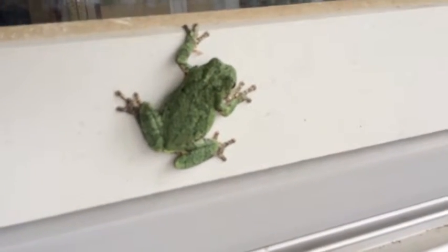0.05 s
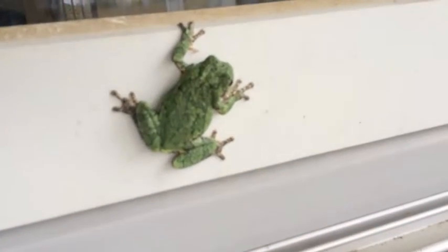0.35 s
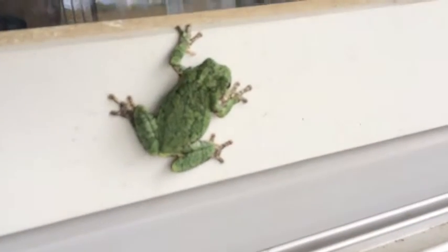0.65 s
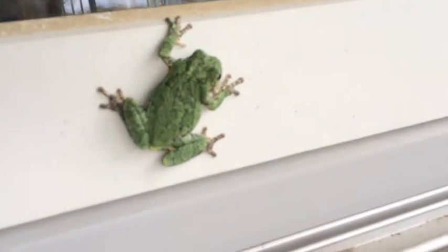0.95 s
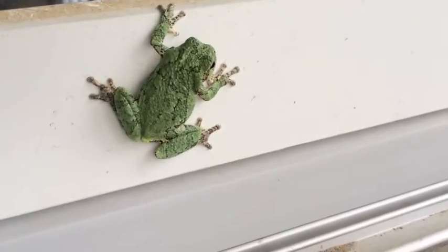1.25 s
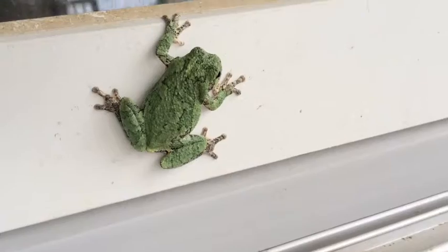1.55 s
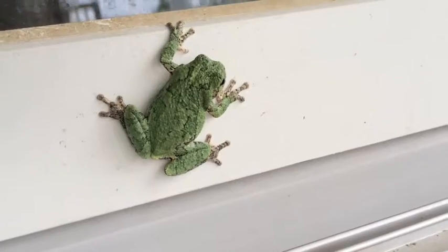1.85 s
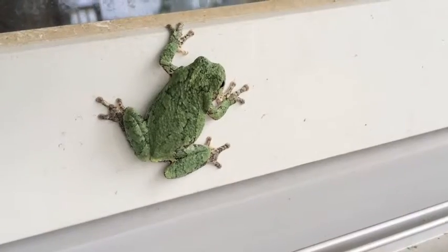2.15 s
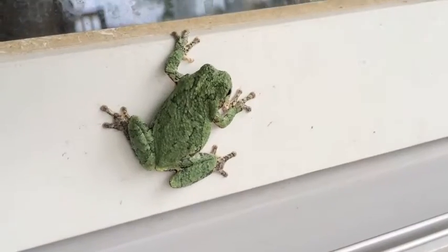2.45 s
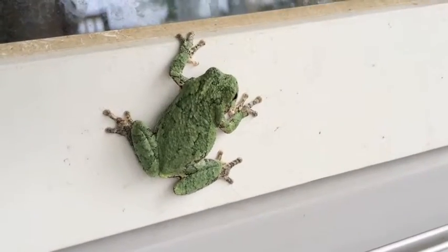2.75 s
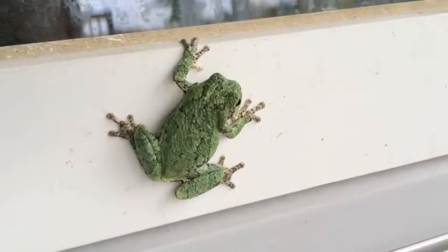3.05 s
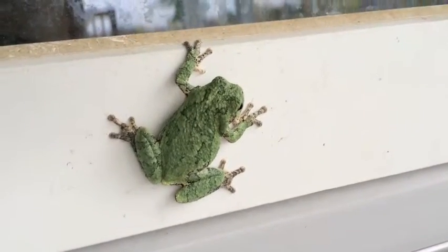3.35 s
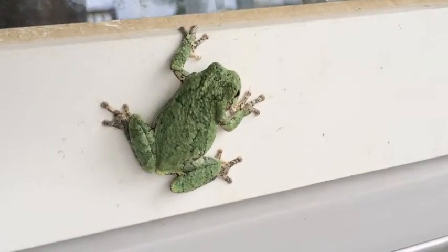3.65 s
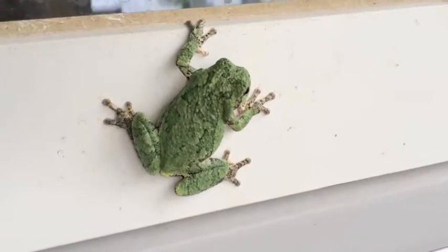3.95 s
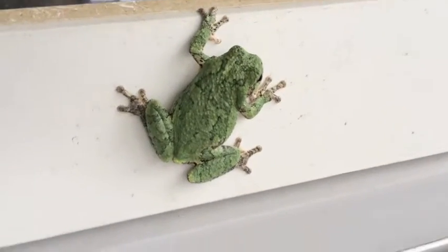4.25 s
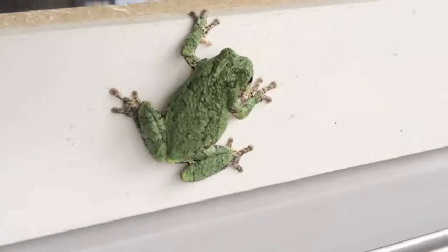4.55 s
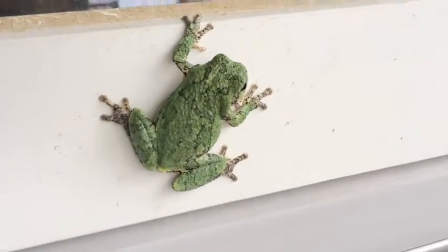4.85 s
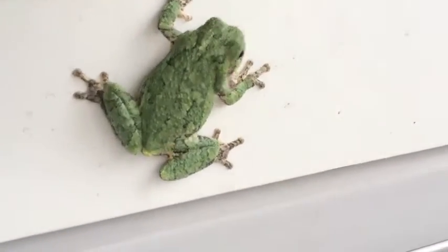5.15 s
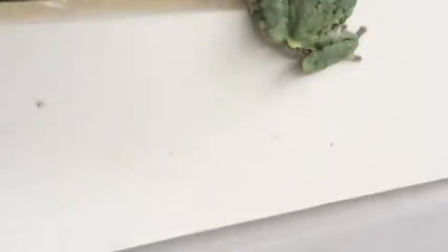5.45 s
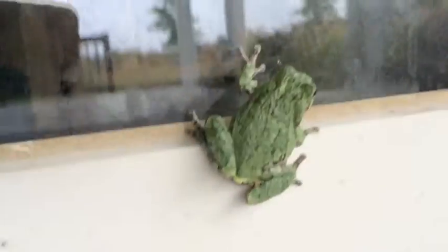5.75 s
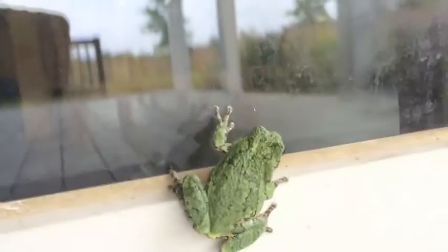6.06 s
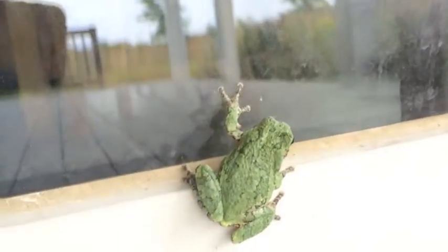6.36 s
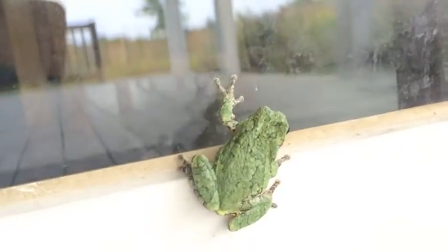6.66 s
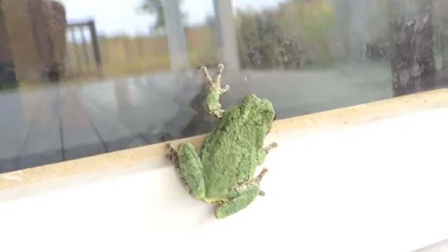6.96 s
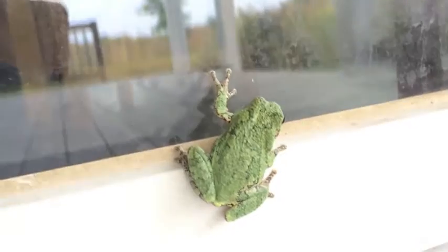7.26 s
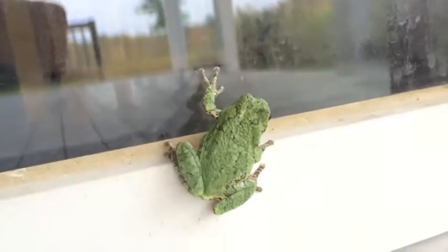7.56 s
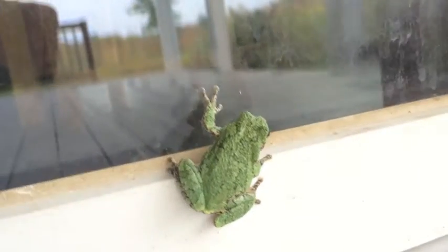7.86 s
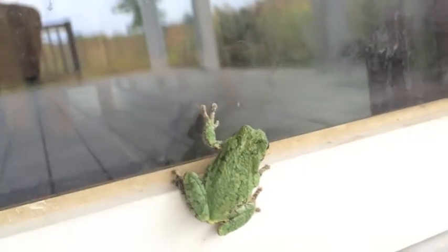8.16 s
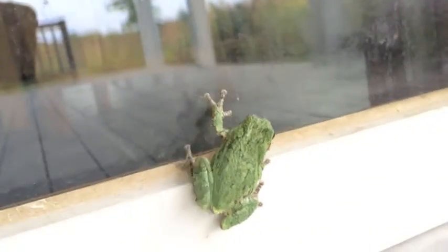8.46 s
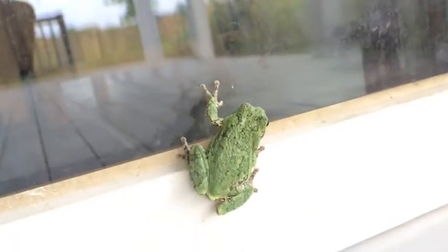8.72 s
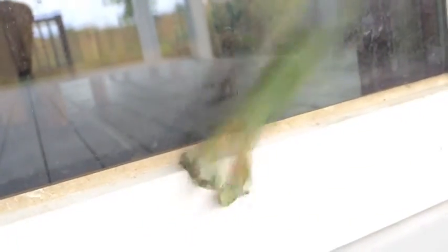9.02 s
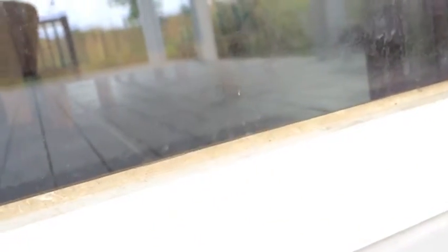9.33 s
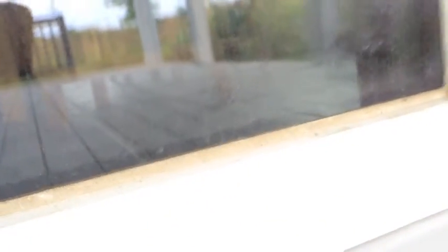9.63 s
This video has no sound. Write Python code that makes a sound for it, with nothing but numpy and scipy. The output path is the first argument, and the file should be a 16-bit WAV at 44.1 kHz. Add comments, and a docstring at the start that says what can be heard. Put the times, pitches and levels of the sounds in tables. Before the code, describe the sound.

Crickets trill steadily outdoors over faint wind rumble, with a few dull microphone bumps and tiny pats from a climbing frog.

```python
"""On a porch, hand-held microphone: crickets and other insects trill in the grass beyond.
Three kinds rub their wings, each a blurred far chorus with one nearer singer whose pulses stand out.
A tree frog climbs the door without calling; its feet make tiny pats and its skin brushes the frame.
Light air rumbles at the microphone, the hand gives it a few soft bumps, and three hoots sound far off.
A faint band of hiss, reflected off the nearby glass, sinks in pitch as the microphone moves."""
import sys
import numpy as np
from scipy import signal
from scipy.fft import rfft, irfft, next_fast_len
from scipy.io import wavfile

SR = 44100
rng = np.random.default_rng(int(sys.argv[2]) if len(sys.argv) > 2 else 0)


def waveform_to_disk(signal):
    """Save audio, clipped to [-1, 1], as 16-bit WAV at the path in sys.argv[1]."""
    frames = np.transpose(np.atleast_2d(signal))
    scaled = np.clip(frames, -1, 1) * 32767
    samples = np.round(scaled).astype(np.int16)
    wavfile.write(sys.argv[1], SR, samples)


N = 436149

# far outdoor hush; the notch near 8.6 kHz comes from audio compression: frequency_hz, relative_db
HUSH_SPECTRUM = [(100, -8), (250, 3), (400, 3.5), (600, 0), (950, 0), (1500, -4), (2100, -5.5),
                 (2700, -7.5), (3300, -7.5), (4500, -7.5), (7000, -12), (8600, -29.5), (10000, -16.5),
                 (15000, -26)]
# spectrum of air moving at the microphone: frequency_hz, relative_db
RUMBLE_SPECTRUM = [(15, -20), (30, -20.5), (45, -5), (62, 2), (90, 0.5), (110, -1.5), (140, -3),
                   (180, -10.5), (250, -16.5), (400, -29.5), (800, -40)]
# strength of the breeze: time_s, level_db
BREEZE_LEVEL = [(0, -60), (2.2, -59.5), (3.2, -60.5), (4.05, -59), (4.5, -64.5), (6.2, -60.5), (7.2, -60),
                (8.4, -63.5), (9.89, -60)]
# faint far hoots: centre_s, pitch_hz, level_db, length_s
FAR_HOOTS = [(3.928, 930, -74, .2), (6.714, 1074, -75, .14), (7.099, 960, -72, .34)]
# single bumps on the microphone: centre_s, level_db, pitch_hz
MIC_BUMPS = [(4.674, -37.5, 95), (4.716, -40.5, 122), (5.058, -33, 78), (5.191, -38.5, 86),
             (5.228, -37.5, 78), (5.426, -40, 108), (5.752, -40.5, 61.4), (6.173, -51, 190),
             (7.431, -28, 108), (7.443, -26, 76), (7.515, -24.5, 151), (7.602, -22.5, 93),
             (7.708, -33.5, 145), (7.805, -24, 84), (9.7, -42, 74)]
# shifts of grip that jostle the microphone: start_s, length_s, level_db, pitch_hz
GRIP_SHIFTS = [(4.754, .05, -49, 76), (5.036, .085, -46, 72), (5.348, .07, -46, 81),
               (5.774, .06, -43.5, 64), (7.169, .17, -53.5, 95), (7.46, .11, -32.5, 124),
               (7.616, .085, -43.5, 133), (7.728, .145, -34, 103.3), (8.041, .16, -49, 79)]
# sticky feet on frame and glass: start_s, level_db (before the bass cut), pitch_hz, ring_s,
# crackle_db (relative to level_db)
FOOT_PATS = [(5.281, -53, 8500, .0003, -6), (5.308, -53, 12500, .0003, -6), (5.349, -44, 4180, .0003, -10),
             (8.408, -32.5, 750, 0.00023, -36), (9.102, -56, 10840, .0003, -3),
             (9.295, -42, 2600, .00025, -26), (9.333, -30.5, 1400, 0.00018, -23),
             (9.371, -53, 12000, .0002, -8)]
# spectrum of the frog's skin brushing the frame: frequency_hz, relative_db
SKIN_SPECTRUM = [(1500, -25), (3500, -11), (8300, 7), (10000, -6), (15000, -8)]
# spectra of the three far choruses and of the wings' overtones: frequency_hz, relative_db
LOW_SPECTRUM = [(3250, -51), (3480, -13.5), (3620, -2), (3720, 2.5), (3800, 3.5), (3900, -6), (4020, -15.5),
                (4350, -32)]
MIDDLE_SPECTRUM = [(4150, -39), (4650, -14.5), (5000, -8), (5300, -1), (5550, 0), (5800, -1.5), (6100, -9),
                   (6600, -25.5)]
HIGH_SPECTRUM = [(5900, -30), (6500, -10), (6850, -2), (7070, 1), (7300, -4), (7550, -10), (7820, -11.5),
                 (8080, -23), (8400, -49)]
SHEEN_SPECTRUM = [(8000, -41), (9200, -8.5), (10200, -7.5), (11100, -2), (12000, -7.5), (12800, -11.5),
                  (14000, -4.5), (14600, -9), (15400, -10)]
# how loudly each kind sings: time_s, level_db (before its trim in the mix)
LOW_SONG = [(0.0, -67), (0.19, -69.5), (0.72, -67.5), (0.99, -70), (2.01, -68), (2.48, -70), (4.05, -67.5),
            (5.04, -69), (5.53, -72), (5.95, -68.5), (6.61, -67), (7.96, -69), (8.48, -67), (9.89, -66.5)]
MIDDLE_SONG = [(0.0, -62), (0.22, -62), (2.18, -61), (2.37, -60.5), (3.55, -61), (4.32, -62.5), (6.01, -61),
               (7.05, -62), (7.35, -61.5), (7.65, -62.5), (9.53, -61.5), (9.89, -60.5)]
HIGH_SONG = [(0.0, -64.5), (1.13, -64), (2.07, -65.5), (2.26, -64), (4.71, -65), (5.95, -63), (9.89, -62.5)]


def gain_of(db):
    """Decibels to a factor."""
    return 10 ** (np.asarray(db) / 20)


def unit_rms(x):
    """Scales to rms 1."""
    return x / np.sqrt(np.mean(x ** 2) + 1e-20)


def clock():
    """The time of every sample, in seconds."""
    return np.arange(N) / SR


def follow(rows):
    """A table of times and levels as a curve, sample by sample."""
    return np.interp(clock(), *np.transpose(rows))


def wander(per_s):
    """A random curve of rms 1 that takes a new value per_s times a second."""
    return unit_rms(np.interp(clock() * per_s, np.arange(2000), rng.standard_normal(2000)))


def coloured(x, spectrum):
    """Filters x by a spectrum table, at rms 1."""
    points_hz, db = np.transpose(spectrum)
    size = next_fast_len(N)
    hz = np.fft.rfftfreq(size, 1 / SR)
    shape = gain_of(np.interp(np.log(hz + 1), np.log(points_hz), db, left=-90, right=-90))
    return unit_rms(irfft(rfft(x, size) * shape, size)[:N])


def noise(spectrum):
    """Noise with the given spectrum, at rms 1."""
    return coloured(rng.standard_normal(N), spectrum)


def resonate(x, hz, width_hz):
    """A steep resonance at rms 1: shifts hz down to zero, smooths twice and shifts back."""
    carrier = np.exp(2j * np.pi * np.cumsum(hz * np.ones(N)) / SR)
    pole = np.exp(-np.pi * width_hz / SR)
    smoothed = signal.lfilter([1.], [1, -2 * pole, pole * pole], x / carrier)
    return unit_rms((carrier * smoothed).real)


def add(mix, start_s, sound):
    """Mixes a sound in at start_s."""
    part = mix[max(round(start_s * SR), 0):][:len(sound)]
    part += sound[:len(part)]


def air(hush_db=-68):
    """A smooth hush from far off, and the lumpy rumble of a light breeze at the microphone."""
    hush = noise(HUSH_SPECTRUM) * gain_of(hush_db + 0.79 * wander(8))
    rumble = unit_rms(noise(RUMBLE_SPECTRUM) * gain_of(2.2 * wander(25)))
    return hush + rumble * gain_of(follow(BREEZE_LEVEL))


def glass_hiss(start_s=7.9, rise_s=.25, start_hz=3280, sink_hz_per_s=220, level_db=-80):
    """A faint band of hiss, reflected off the nearby glass, sinks in pitch as the microphone moves."""
    since_s = np.maximum(clock() - start_s, 0)
    hiss = resonate(rng.standard_normal(N), start_hz - sink_hz_per_s * since_s, width_hz=360)
    return hiss * gain_of(level_db) * np.minimum(since_s / rise_s, 1)


def far_hoots(waver=0.0124):
    """Distant wavering tones, each swelling and fading in the hush."""
    out = np.zeros(N)
    for centre_s, hz, db, length_s in FAR_HOOTS:
        size = round(length_s * SR)
        cycles = np.cumsum(hz * (1 + waver * wander(37)[:size])) / SR
        add(out, centre_s - length_s / 2, gain_of(db) * np.hanning(size) * np.sin(2 * np.pi * cycles))
    return out


def add_bump(mix, centre_s, db, hz, half_cycles=0.56):
    """One bump on the microphone: a dull push of a cycle or two with a weaker, higher knock."""
    t = np.arange(-SR // 16, SR // 16) / SR
    swell = np.exp(1.7 * (1 - np.sqrt(1 + (t * hz / half_cycles) ** 2)))
    push = np.cos(2 * np.pi * (hz * t + rng.random()))
    knock = 0.19 * np.cos(2 * np.pi * (1.84 * hz * t + rng.random()))
    add(mix, centre_s + t[0], gain_of(db) * swell * (push + swell * knock))


def handling(bumps_per_s=50, unevenness=0.189, spread_db=2.5, spread_octaves=0.35):
    """The hand knocks the microphone, and each shift of grip sets off a run of uneven bumps."""
    out = np.zeros(N)
    for centre_s, db, hz in MIC_BUMPS:
        add_bump(out, centre_s, db, hz)
    for start_s, length_s, db, hz in GRIP_SHIFTS:
        for k, (late, louder, higher) in enumerate(rng.standard_normal((16, 3))):
            if k / bumps_per_s <= length_s:
                centre_s = start_s + (k + unevenness * late) / bumps_per_s
                add_bump(out, centre_s, db + spread_db * louder, hz * 2 ** (spread_octaves * higher))
    return out


def frog(brush_at_s=5.315, brush_half_s=0.047, brush_db=-70, crackle_s=0.0016):
    """On the door, skin brushes the frame and wet toe pads give dead pats with a short crackle."""
    brush = np.exp(-.5 * ((clock() - brush_at_s) / brush_half_s) ** 4)
    out = noise(SKIN_SPECTRUM) * brush * gain_of(brush_db + 3.5 * wander(120))
    t = np.arange(SR // 40) / SR
    for start_s, db, hz, ring_s, crackle_db in FOOT_PATS:
        pat = np.sin(2 * np.pi * hz * t) * np.exp(-t / ring_s)
        bass_cut = signal.butter(2, 0.55 * hz, "highpass", fs=SR)  # so small a pad radiates no bass
        crackle = gain_of(crackle_db) * rng.standard_normal(len(t)) * np.exp(-t / crackle_s)
        add(out, start_s, gain_of(db) * (signal.lfilter(*bass_cut, pat) + crackle))
    return out


def wing_strokes(per_s, sharpness, slip_cycles=0.046):
    """One burst of tooth strikes each time the wings close, a little early or late."""
    cycles = np.cumsum(per_s) / SR + rng.random() + slip_cycles * wander(30)
    bursts = np.exp(sharpness * np.cos(2 * np.pi * cycles))
    return unit_rms(bursts * rng.standard_normal(N))


def chorus(levels, spectrum, wing_hz, width_hz, pulses_per_s, drift, sharpness,
           near_share, near_lead, flutter_db):
    """A near singer rings at its wings' pitch and stands out as the song swells; six sing far off."""
    level_db = follow(levels)
    swell_db = level_db - level_db.mean()
    share = np.clip(near_share * gain_of(near_lead * swell_db), 0, .8)  # near singer's part of the power
    near_strokes = wing_strokes(pulses_per_s * (1 + drift * wander(2)), sharpness)
    near = resonate(near_strokes, wing_hz, width_hz)
    far = np.zeros(N)
    for _ in range(6):
        pace = rng.uniform(0.74, 1.2) + 0.0406 * wander(3)
        far += wing_strokes(pulses_per_s * pace, sharpness=0.16)
    song = np.sqrt(share) * near + np.sqrt(1 - share) * coloured(far, spectrum)
    return song * gain_of(level_db + flutter_db * wander(12))


def insects(sheen_db=-77.5):
    """Out in the grass: a low cricket trill, a fast buzz, a high throb and a sheen of overtones."""
    low = chorus(LOW_SONG, LOW_SPECTRUM, wing_hz=3770, width_hz=296, pulses_per_s=38.7,
                 drift=0.0255, sharpness=0.98, near_share=0.18, near_lead=2.6, flutter_db=0.6)
    middle = chorus(MIDDLE_SONG, MIDDLE_SPECTRUM, wing_hz=5550, width_hz=380, pulses_per_s=77.3,
                    drift=0.0016, sharpness=1.3, near_share=0.17, near_lead=5.2, flutter_db=0.24)
    high = chorus(HIGH_SONG, HIGH_SPECTRUM, wing_hz=7064, width_hz=490, pulses_per_s=15.3,
                  drift=0.0352, sharpness=1.5, near_share=0.15, near_lead=1.8, flutter_db=0.24)
    sheen = noise(SHEEN_SPECTRUM) * unit_rms(gain_of(0.66 * follow(HIGH_SONG)))
    return gain_of(0.7) * low + gain_of(0.5) * middle + gain_of(1.17) * high + gain_of(sheen_db) * sheen


def scene():
    """Everything as it reaches one microphone on the porch."""
    return (insects() + air() + glass_hiss() + far_hoots() + handling() + frog())[None]


def record(dry, low_cut_hz=22, high_cut_hz=15330):
    """The microphone sheds the deepest bass, and the top treble is cut off steeply."""
    low_cut = signal.butter(1, low_cut_hz, "highpass", fs=SR, output="sos")
    high_cut = signal.firwin(1023, high_cut_hz, window=("kaiser", 9), fs=SR)
    return signal.oaconvolve(signal.sosfilt(low_cut, dry), high_cut[None], "same")


dry = scene()
out = record(dry)
waveform_to_disk(out)
```